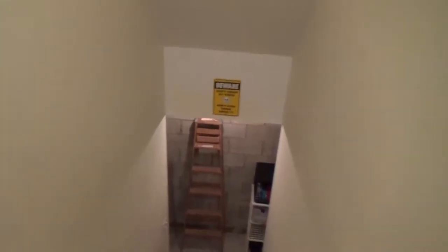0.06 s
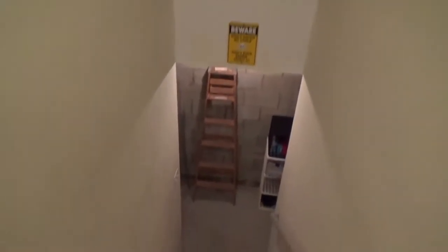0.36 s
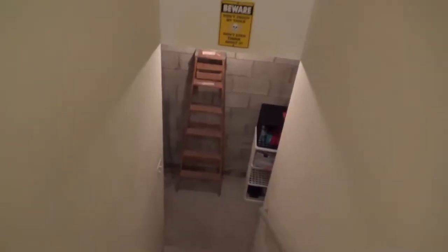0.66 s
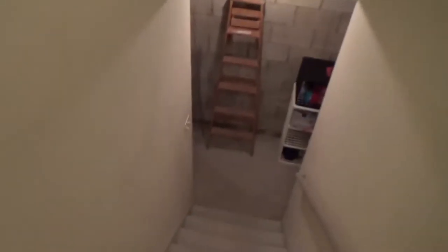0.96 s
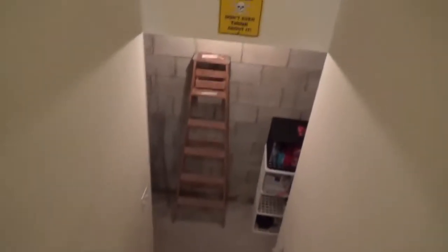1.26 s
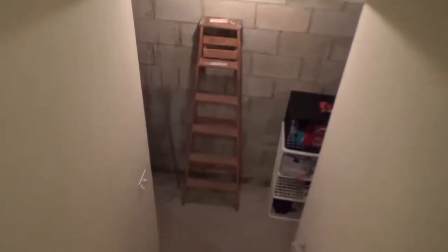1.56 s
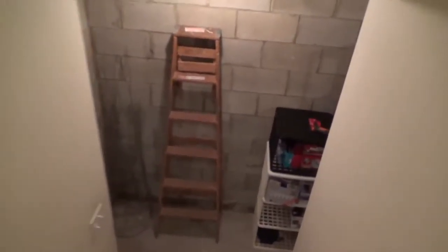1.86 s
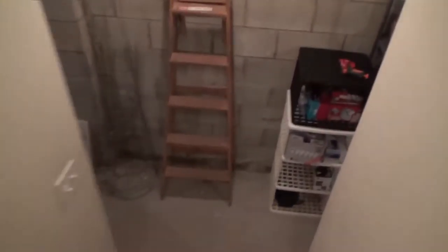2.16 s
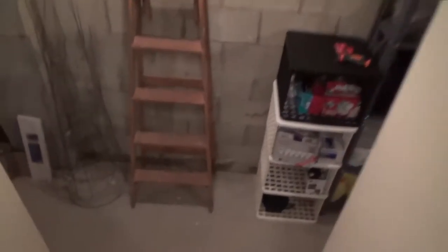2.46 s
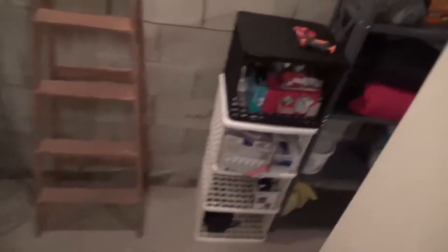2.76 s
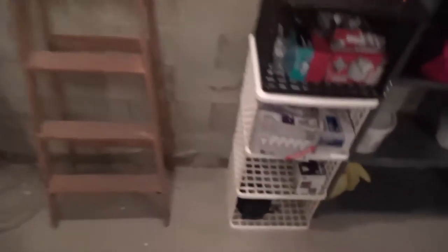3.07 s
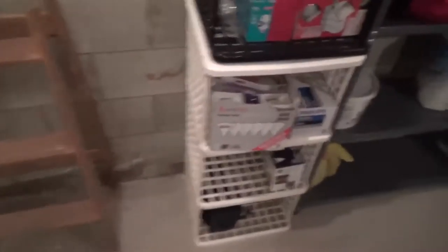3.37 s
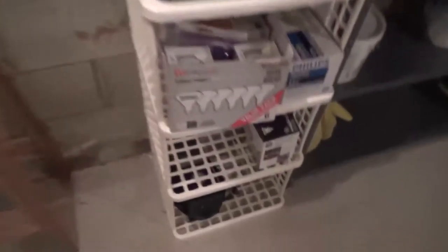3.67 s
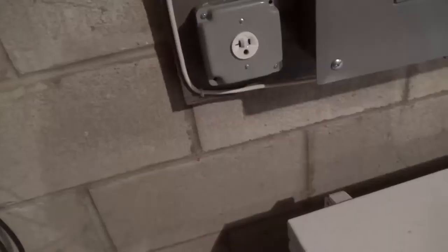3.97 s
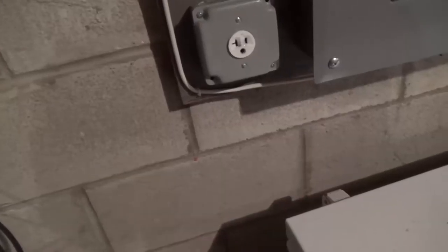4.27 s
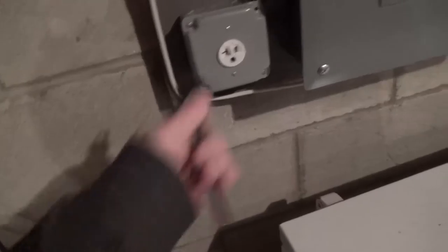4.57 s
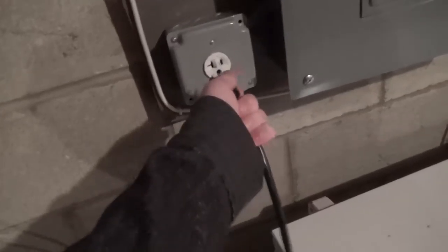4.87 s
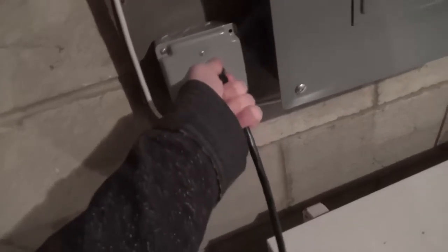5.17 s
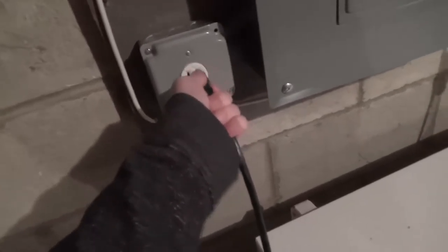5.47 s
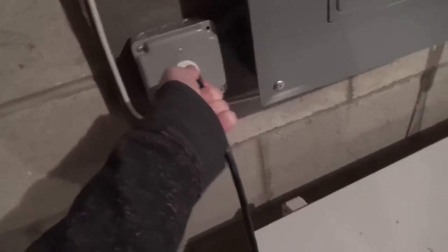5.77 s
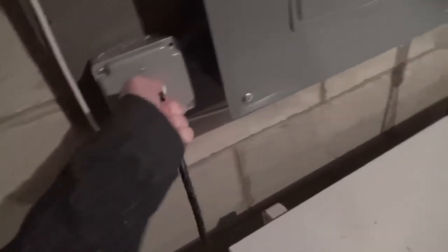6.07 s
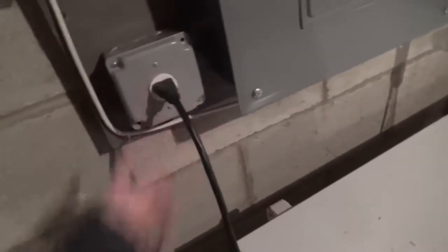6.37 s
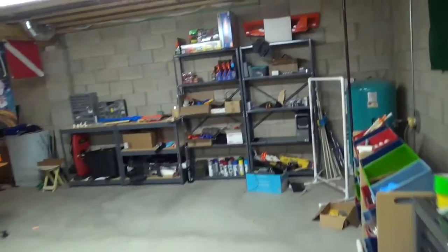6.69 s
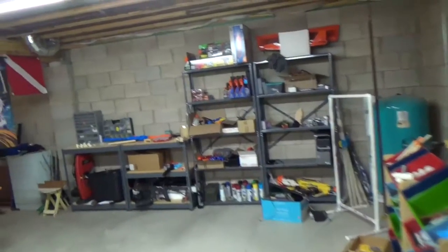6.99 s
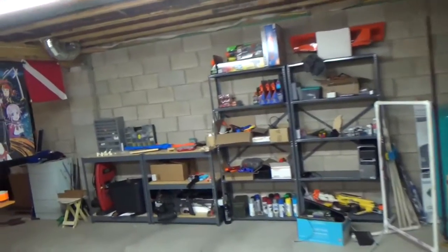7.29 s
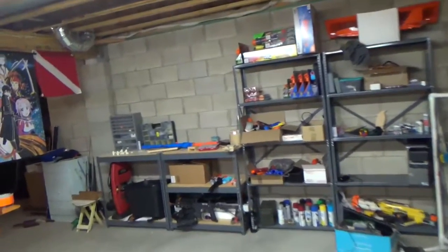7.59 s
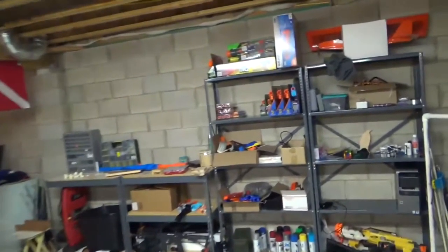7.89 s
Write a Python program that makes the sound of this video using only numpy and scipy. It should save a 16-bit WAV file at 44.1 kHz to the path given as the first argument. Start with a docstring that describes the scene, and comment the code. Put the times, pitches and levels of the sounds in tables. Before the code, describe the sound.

From the start, heavy shoes go down wooden stairs in a narrow stairwell, close by, about two steps a second. Each lands toe then heel with a hollow boom and a clack, among small sharp clicks and faint clothing rustle. A sole scrapes at about 1.8 seconds. The steps lighten and end with a gritty scuff on concrete near 3.8 seconds. A faint machine hum, present throughout, becomes slightly louder at 4 seconds and is heard alone for a moment. From 5.2 to 5.9 seconds a plug is worked into a metal outlet box with several short, ringing knocks and grating prongs, the last push loudest. A sleeve swishes and small clicks follow, then a brief, close plastic rattle at 6.5 seconds. The hum drops back, and from about 7 to 8 seconds a jacket swishes softly between a few light, dull taps echoing in the basement.

```python
"""A narrow stairwell: heavy shoes go down wooden stairs, exciting the modes of each tread and the hollow
beneath, and scuff onto basement concrete amid small clicks. The scene jumps to a metal outlet box, which
rings as a plug is worked in, then, after a close plastic rattle, to the open basement, where a jacket
swishes between a few light taps. Impacts are cracks with decaying echoes, friction is modulated noise,
and a machine hums faintly throughout."""
import sys
import numpy as np
from scipy.fft import rfft, irfft, next_fast_len
from scipy.io import wavfile
from scipy.ndimage import map_coordinates

SR = 44100
rng = np.random.default_rng(int(sys.argv[2]) if len(sys.argv) > 2 else 0)


def wav_out(sig):
    """Save sig, one row per channel (or a flat mono array), as 16-bit PCM at SR to the path in sys.argv[1]."""
    wavfile.write(sys.argv[1], SR, np.round(np.clip(np.atleast_2d(sig).T, -1, 1) * 32767).astype(np.int16))


N = 350154
TIME = np.arange(N) / SR
AGE = np.arange(24576) / SR  # seconds since an impact

# jumps of the scene, where all ringing stops: time_s
JUMPS = [3.931, 6.54]
# the ball of the foot landing: start_s, thump_db, clack_db, tread_hz, sole_hz, settle_after_s,
# settle_thump_db, settle_clack_db, settle_grit_db, swish_lead_s, swish_db
TOES = [(0.427, -18.5, -16.5, 403, 1380, .071, -31.5, -36, -31.5, 0.057, -57),
        (0.902, -13, -22.5, 395.7, 1220, 0.069, -19, -19.5, -31, 0.037, -37),
        (1.501, -15.5, -17, 370.8, 1180, 0.077, -19.5, -14.5, -37, 0.049, -38),
        (2.023, -16, -14, 429, 1400, 0.075, -24.5, -22.5, -40, 0.072, -35),
        (2.475, -14, -14, 405.5, 1260, .048, -14.5, -23, -32.5, .079, -38.5),
        (3.05, -16.5, -20, 351, 1180, 0.067, -22.5, -25, -36, 0.092, -41),
        (3.595, -25.5, -23, 450, 1600, .047, -39, -42, -34.5, 0.056, -52.5)]
# the heel landing: the same columns without the last two
HEELS = [(0.002, -27, -30, 175.5, 1420, 0.044, -45, -44, -60),
         (1.126, -20, -18, 372.5, 1260, 0.065, -19, -18.5, -27),
         (1.701, -18.5, -19, 385.3, 1300, 0.062, -19.5, -16.5, -17),
         (2.177, -12.5, -18, 391.7, 1230, 0.07, -20, -22, -33),
         (2.652, -14, -21, 381.9, 1250, .054, -23, -32, -56),
         (3.207, -18.5, -17.5, 428.4, 1570, .069, -23.5, -29, -45),
         (3.751, -34, -28.5, 437, 1400, 0.05, -34.5, -24, -45)]


def amp(db):
    """Decibels to amplitude ratio."""
    return 10 ** (np.asarray(db) / 20)


def along(points, hz):
    """Interpolation of (frequency_hz, value) points on a logarithmic frequency axis."""
    f, v = np.transpose(points)
    return np.interp(np.log(hz + 1), np.log(f + 1), v)


def wobble(rate):
    """Slow random modulation: a spline through rate knots a second."""
    return map_coordinates(rng.standard_normal(int(N * rate / SR) + 4), [TIME * rate], order=2)


def filtered(x, gain):
    """Linear filtering: the spectrum of x times gain(hz)."""
    m = next_fast_len(N + 8192)
    return irfft(rfft(x, m) * gain(np.fft.rfftfreq(m, 1 / SR)), m)[..., :N]


def noise(spectrum):
    """Stationary coloured noise, mid and side, with a mid rms of 1."""
    x = filtered(rng.standard_normal((2, N)), lambda hz: amp(along(spectrum, hz)))
    return x / x[0].std()


def causal(spectrum):
    """The minimum-phase response with this spectrum: nothing sounds before the impact."""
    n = len(AGE)
    cepstrum = irfft(np.log(amp(along(spectrum, np.fft.rfftfreq(n, 1 / SR))) + 1e-6))
    cepstrum[1:n // 2] *= 2
    cepstrum[n // 2 + 1:] = 0
    return np.exp(rfft(cepstrum))


def resonant(hz, boost_db, q):
    """A second-order resonance added to a flat response."""
    ratio = np.fft.rfftfreq(len(AGE), 1 / SR) / hz
    return 1 + amp(boost_db) * 1j * ratio / (1j * ratio + q * (1 - ratio * ratio))


def ripple(depth, life_s):
    """Interference with a small body's brief ringing puts chance peaks and dips in a response."""
    ringing = rng.standard_normal(len(AGE)) * np.exp(-AGE / life_s)
    return 1 + depth * rfft(ringing / np.linalg.norm(ringing))


def levelled(pair):
    """Normalisation to a mid rms of 1 over the first 40 ms, so spectra and modes set only the colour."""
    return pair / np.sqrt(np.mean(pair[0, :int(.04 * SR)] ** 2))


def blow(colour, t60, hold, crack_db, crack_t60):
    """Direct sound and diffuse field: a crack, and echoes that hold, then decay (times in seconds)."""
    field = rng.standard_normal((2, len(AGE))) * amp(-60 * (np.hypot(AGE, hold) - hold) / t60)
    field[0] += rng.standard_normal(len(AGE)) * amp(crack_db - 60 * AGE / crack_t60)
    return levelled(irfft(rfft(field) * colour))


def ring(modes, tuning, attack_s, detune, scatter_db):
    """Free vibration: damped modes, scattered in pitch and strength, reach the side in another phase."""
    hz, db, t60 = np.transpose(modes)[:, :, None]
    drift, strength, offset = rng.standard_normal((3, len(modes), 1))
    phase = (2 * np.pi * hz * tuning * (1 + detune * drift) * AGE).astype(np.float32)
    side_shift = (np.pi * offset).astype(np.float32)
    decay = amp(db + scatter_db * strength) * np.exp(-np.log(1000) * AGE / t60)
    pair = np.array([(decay * np.sin(phase + shift)).sum(0) for shift in (0, side_shift)])
    return levelled(pair * (1 - np.exp(-AGE / attack_s)))


def swish(s, half_s, db):
    """A Gaussian envelope of rubbing centred on s seconds."""
    return amp(db) * np.exp(-.5 * ((TIME - s) / half_s) ** 2)


def add(track, s, sound):
    """Superposition of a sound from s seconds on, cut off at the scene's next jump."""
    start = max(0, round(s * SR))
    end = min([round(j * SR) for j in JUMPS if j > s] + [N, start + sound.shape[1]])
    track[:, start:end] += sound[:, :end - start]


def contacts():
    """A footfall is a series of impacts: toe and heel land, then settle; the toe also rolls flat."""
    roll_fade = [(2.1, 0), (3.6, -15)]  # the feet land flatter near the bottom: time_s, gain_db
    grit_re_clack_db, grit_db_per_octave = -16, 14
    # the body's weight arrives as the toe settles and shakes the stairs most
    for rows, settle_bass_db in ((TOES, 6), (HEELS, -1.5)):
        for s, thump, clack, tread_hz, sole_hz, wait_s, late_thump, late_clack, late_grit, *_ in rows:
            grit = clack + grit_re_clack_db + grit_db_per_octave * np.log2(sole_hz / 1350)
            yield s, thump, clack, grit, 0, tread_hz, sole_hz
            loaded_sole_hz = 1350 * 1.136  # a loaded sole clacks higher
            yield s + wait_s, late_thump, late_clack, late_grit, settle_bass_db, tread_hz, loaded_sole_hz
    for s, thump, clack, tread_hz, sole_hz, *_ in TOES:
        fade_db = np.interp(s, *np.transpose(roll_fade))
        roll_thump, roll_clack = thump - 3.5 + fade_db, clack - 8 + fade_db
        yield s + .025, roll_thump, roll_clack, roll_clack + grit_re_clack_db, -4, tread_hz, sole_hz


def footsteps():
    """Impact excitation: each contact booms in the hollow stairs, rings a tread and clacks on grit."""
    tread_modes = [(384.7, 1.5, 0.45), (161.4, -12, 0.17), (214.5, -16, 0.69), (394.4, -2, 0.16),
                   (444, -3, 0.33), (492, -12.5, 0.48), (531.4, -8, 0.26), (688, -7.5, 0.45),
                   (802, -18, 0.29), (920, -19, 0.22)]  # a wooden tread, main mode first: pitch_hz, level_db, t60_s
    hollowness = [(0, 5), (.42, 0), (.9, 2), (1.7, 1.5), (2.2, -0.5), (2.7, -1.5), (3.12, 5.5), (3.21, -4),
                  (3.6, -18)]  # depth of the boom, fading towards the concrete: time_s, gain_db
    # spectra of a footfall's parts, low to high: frequency_hz, density_db
    boom_spectrum = [(20, -32), (40, -7), (53, -1.5), (68, -6), (85, -3.5), (110, 3), (140, -26),
                     (300, -57)]
    thud_spectrum = [(70, -28.5), (125, -8), (160, 2.5), (230, 2.5), (290, -10.5), (400, -9), (900, -66)]
    knock_spectrum = [(100, -37), (220, -6), (340, -2.5), (480, -0.5), (580, -5), (720, -5.5), (950, -10),
                      (2000, -70)]
    sole_spectrum = [(300, -30), (750, -1), (1000, 2.5), (1350, 2.5), (1800, -1), (2600, -9.5), (4000, -22),
                     (8000, -42.5)]  # for a sole pitched at 1350 Hz
    grit_spectrum = [(1000, -29), (2800, 9.5), (4000, 8), (5500, 2), (7000, -2.5), (10000, 0),
                     (12500, -8.5), (15500, -33)]
    out = np.zeros((2, N))
    boom, thud, knock, grit = map(causal, (boom_spectrum, thud_spectrum, knock_spectrum, grit_spectrum))
    landing = 1 - np.exp(-AGE / .0013)  # the rubber sole gives a little
    for s, thump_db, clack_db, grit_db, bass_db, tread_hz, sole_hz in contacts():
        hollow_db = np.interp(s, *np.transpose(hollowness))
        deep_db = thump_db + hollow_db + bass_db
        sole = causal(np.array(sole_spectrum) * [sole_hz / 1350, 1])
        clack = sole * ripple(depth=.75, life_s=.0053) * resonant(sole_hz, boost_db=-9.5, q=9)
        step = amp(deep_db - 25) * blow(boom, t60=.38, hold=.023, crack_db=7.5, crack_t60=.014)
        step += amp(deep_db - 16.5) * blow(thud, t60=.24, hold=.075, crack_db=3, crack_t60=.17)
        step += amp(thump_db - 4.5) * blow(knock, t60=.51, hold=.014, crack_db=7, crack_t60=.045)
        tuning = tread_hz / tread_modes[0][0]
        tread = ring(tread_modes, tuning, attack_s=.0062, detune=.01206, scatter_db=6.5)
        step += amp(thump_db + .36 * hollow_db - 6) * tread
        step += amp(clack_db - 5.5) * blow(clack, t60=.48, hold=.0023, crack_db=14.5, crack_t60=.024)
        crunch = grit * ripple(depth=.44, life_s=.0014)
        step += amp(grit_db - 6) * blow(crunch, t60=.34, hold=.0018, crack_db=9.5, crack_t60=.012)
        add(out, s, step * landing)
    return out


def clothes():
    """Stick-slip friction: the weave catches and slips as legs stride, an arm reaches, the body turns."""
    stride = [(0, -48), (0.4, -66), (0.6, -53), (1.2, -48.5), (2.5, -47.5), (3.6, -51), (3.93, -51)]  # faint rubbing while walking: time_s, level_db
    reaches = [(5.3, 0.12, -57.5), (5.76, 0.067, -52.5), (6.035, 0.02, -41), (6.203, 0.063, -56),
               (6.65, 0.22, -58.5)]  # the sleeve as the arm works: centre_s, half_length_s, level_db
    turns = [(7.035, -46.5), (7.4, -45), (7.681, -45.5), (7.96, -48.5)]  # the jacket as the body turns: centre_s, level_db
    # friction spectra of trousers and sleeve, and of the jacket: frequency_hz, density_db
    limb_spectrum = [(400, -2), (800, 4), (1500, 1), (3000, -3), (5000, -7.5), (7000, -9.5), (10000, -5),
                     (12000, -9), (15500, -28.5)]
    jacket_spectrum = [(350, -31), (600, -2.5), (706, -3.5), (855, -6), (1030, -1), (1230, -1),
                       (1510, -0.5), (3240, 0), (7140, -5.5), (10200, -3), (12100, -7), (15500, -21)]
    rubbing = amp(np.interp(TIME, *np.transpose(stride), right=-120))
    knee_bends = sum(swish(s + .088, half_s=.021, db=.5) for s, *_ in HEELS[1:])
    leg_swings = sum(swish(s - lead_s, half_s=.015, db=db) for s, *_, lead_s, db in TOES)
    limbs = rubbing * (1 + knee_bends) + leg_swings + sum(swish(*reach) for reach in reaches)
    turning = (TIME > 6.99) * (amp(-50) + sum(swish(s, half_s=.044, db=db) for s, db in turns))
    catching = amp(.52 * wobble(60) + 1.86 * wobble(800))
    return catching * (limbs * noise(limb_spectrum) + turning * noise(jacket_spectrum))


def machine():
    """A line spectrum over broadband noise: a distant machine's wavering tones and a soft rush of air."""
    partials = [(86.1, -68.5), (188.4, -64), (382.2, -61), (2885, -87)]  # the hum: pitch_hz, relative_db
    air_spectrum = [(15, -52.5), (25, -17), (49, -46.5), (71, -15.5), (178, -10), (260, -8.5), (289, -16),
                    (378, -3), (421, -11), (871, -15.5), (1660, -25), (1800, -24), (1950, -25.5),
                    (2490, -26.5), (15500, -37.5)]  # the rush: frequency_hz, density_db
    # gains of hum and air in each place: stairwell_db, outlet_db, basement_db
    hum_db = [-55.5, -45, -68]
    air_db = [-52, -49.5, -54]
    place = np.searchsorted(JUMPS, TIME)
    swell, waver = amp(3.3 * wobble(4.8)), wobble(4.7)
    tones = sum(amp(db + 49) * np.sin(2 * np.pi * hz * TIME + .5 * waver) for hz, db in partials)
    mid_side = np.array([[1], [.5]])
    return amp(air_db)[place] * noise(air_spectrum) + amp(hum_db)[place] * swell * tones * mid_side


def clicks():
    """Brief impulses have broad spectra: small sharp ticks near by, with a sparkle in the high treble."""
    events = [(0.325, -37, -60), (0.9537, -21, -39), (1.345, -23.5, -54), (2.2906, -24, -40.5),
              (3.0925, -18.5, -38), (3.1377, -25, -37), (3.179, -32, -38.5), (3.6416, -21, -37),
              (3.7179, -37, -36.5), (3.8588, -18, -55), (5.472, -30.5, -62), (5.9569, -29, -31.5),
              (6.1835, -35, -45.5)]  # the clicks: start_s, tick_db, sparkle_db
    # spectra of their two parts: frequency_hz, density_db
    tick_spectrum = [(700, -21), (1800, 9), (3300, 5.5), (5000, 8), (7000, -11), (12000, -36)]
    sparkle_spectrum = [(3000, -30.5), (7000, 1), (10000, 2), (13000, -3.5), (15500, -17)]
    out, tick, sparkle = np.zeros((2, N)), causal(tick_spectrum), causal(sparkle_spectrum)
    for s, tick_db, sparkle_db in events:
        colour = tick * ripple(depth=.87, life_s=.0015)
        add(out, s, amp(tick_db - 19) * blow(colour, t60=.28, hold=.002, crack_db=16, crack_t60=.022))
        add(out, s, amp(sparkle_db - 9) * blow(sparkle, t60=.17, hold=.002, crack_db=11, crack_t60=.016))
    return out


def scrapes():
    """Sliding friction: a sole crushes grains of grit, and reverberation carries the hiss on."""
    slides = [(1.768, 0.062, -26), (3.754, 0.044, -24.5)]  # soles sliding: start_s, length_s, level_db
    grit_spectrum = [(180, -40), (300, -12), (453, 2), (620, -4), (1030, -0.5), (1620, -5.5), (2250, -3),
                     (2880, -1), (6050, -13), (10600, -16.5), (13600, -32), (15500, -58.5)]  # crushed grit: frequency_hz, density_db
    out, colour = np.zeros((2, N)), causal(grit_spectrum)
    slide_t60, echo_t60 = .2, .32
    for s, length_s, db in slides:
        since_stop = np.maximum(AGE - length_s, 0)
        sliding = np.clip(AGE / .0093, 0, 1) * amp(-60 * since_stop / slide_t60)
        echoing = np.clip(AGE / length_s, 0, 1) * amp(-60 * since_stop / echo_t60)
        grains = rng.standard_normal((2, len(AGE))) * rng.exponential(size=len(AGE)) ** 1.4
        echoes = rng.standard_normal((2, len(AGE))) * echoing
        add(out, s, amp(db) * levelled(irfft(rfft(grains * sliding + 1.14 * echoes) * colour)))
    return out


def plug():
    """Impact and friction: each push rings the box on its board as prongs grate into their contacts."""
    pushes = [(5.186, -17, -8, -37), (5.212, -19.5, -24, -23), (5.474, -23.5, -5, -28),
              (5.602, -38.5, -3, -26), (5.858, -12.5, -1, -17), (5.88, -9, -5.5, -13)]  # pushes on the plug: start_s, level_db, box_relative_db, prong_relative_db
    box_modes = [(300, -9, 0.3), (373, -15.5, 0.39), (685, -10.5, 0.26), (750.6, 3, 0.12),
                 (871, -3.5, 0.19), (957, -2, 0.11), (1295, -11, 0.14), (1900, -15, 0.14),
                 (2082, -16, 0.11), (3930, -29, .12), (4210, -17, 0.09), (5430, -33, .1)]  # the metal outlet box: pitch_hz, level_db, t60_s
    # spectra of the board, the grating prongs and their slide in the slots: frequency_hz, density_db
    board_spectrum = [(20, -62), (60, -48), (120, -9.5), (300, -3.5), (520, -1.5), (700, 3), (920, 3.5),
                      (1200, -8), (2000, -13.5), (3200, -22), (5700, -31), (9000, -47)]
    prong_spectrum = [(880, -16), (1500, -0.5), (2370, -0.5), (3250, -8.5), (3760, -4.5), (5340, -5.5),
                      (6190, -9.5), (6620, -11.5), (10300, -7), (12900, -18), (15500, -54)]
    slide_spectrum = [(2200, -40), (3000, 0), (3700, -25), (6000, -40)]
    out, board, prongs = np.zeros((2, N)), causal(board_spectrum), causal(prong_spectrum)
    for s, db, box_db, prong_db in pushes:
        push = amp(box_db - 6.5) * ring(box_modes, tuning=1, attack_s=.001, detune=.006, scatter_db=1.5)
        push += amp(box_db - 10) * blow(board, t60=.46, hold=.002, crack_db=11, crack_t60=.042)
        grating = prongs * ripple(depth=1, life_s=.0018)
        push += amp(prong_db - .5) * blow(grating, t60=.54, hold=.002, crack_db=18.5, crack_t60=.074)
        add(out, s, amp(db) * push)
    return out + swish(5.37, half_s=.05, db=-60) * noise(slide_spectrum)


def rattle():
    """Direct sound dominates at short range: plastic bumps and snaps too close for the room to answer."""
    bumps = [(6.503, -28.5, -52), (6.5114, -30, -27.5), (6.528, -57, -29), (6.535, -55, -56)]  # plastic contacts: start_s, shell_db, snap_db
    # spectra of the shell's bump and its snap: frequency_hz, density_db
    shell_spectrum = [(30, -50), (110, -13), (230, 1), (430, 0.5), (850, -17), (1400, -7), (2000, 0.5),
                      (3100, -16), (6000, -10.5), (9000, -18), (13000, -35)]
    snap_spectrum = [(240, -25), (400, -9), (673, -23), (847, 1.5), (987, -5), (1610, -4.5), (5070, -6.5),
                     (7100, -11), (10700, -8), (15500, -27)]
    out, shell, snap = np.zeros((2, N)), causal(shell_spectrum), causal(snap_spectrum)
    pressing = 1 - np.exp(-AGE / .0012)
    for s, shell_db, snap_db in bumps:
        bump = pressing * blow(shell, t60=.043, hold=.004, crack_db=3, crack_t60=.032)
        add(out, s, amp(shell_db) * bump)
        add(out, s, amp(snap_db) * blow(snap, t60=.067, hold=.001, crack_db=-2, crack_t60=.012))
    return out


def taps():
    """Reverberation prolongs light, dull impacts further off in the room."""
    events = [(6.935, -49), (7.242, -48.5), (7.5293, -41.5), (7.64, -49.5)]  # the taps: start_s, level_db
    tap_spectrum = [(120, -20), (300, 0.5), (540, -1), (800, 0), (1600, -5), (3000, -12), (8000, -46)]  # their colour: frequency_hz, density_db
    out = np.zeros((2, N))
    colour = causal(tap_spectrum) * resonant(hz=523, boost_db=-1.5, q=4)
    for s, db in events:
        add(out, s, amp(db) * blow(colour, t60=.85, hold=.005, crack_db=12, crack_t60=.04))
    return out


def placed(pair, width, lean):
    """Mid and side to left and right; lean scales the level and phase cues that give a direction."""
    level_cue = [(40, 4), (130, 2), (300, .7), (600, 0), (8000, -.3)]  # the bass is louder on the right: frequency_hz, right_over_left_db
    phase_cue = [(40, .1), (110, 0.43), (260, 0.54), (600, 0.66), (2330, 0.15), (7000, 0)]  # the left hears it first: frequency_hz, lead_rad
    mid, side = pair[0], filtered(pair[1], lambda hz: amp(along(width, hz)))
    share = lean * np.array([[-.5], [.5]])
    return filtered(np.array([mid + side, mid - side]),
                    lambda hz: amp(share * along(level_cue, hz)) * np.exp(-1j * share * along(phase_cue, hz)))


def scene():
    """Reflections from close walls spread the footfalls wide; in the other sounds bass is nearly mono."""
    # stereo width of the stairwell and the open basement: frequency_hz, side_over_mid_db
    stair_width = [(40, -15), (100, -14), (200, -9.5), (450, -7.5), (1200, -4.5), (4000, -7.5),
                   (10000, -17)]
    room_width = [(60, -24), (110, -22), (200, -20), (380, -16.5), (700, -8.5), (1290, -6), (2380, -7),
                  (4400, -7), (8120, -10), (15000, -27)]
    stairwell = placed(footsteps(), stair_width, lean=1)
    room = clothes() + machine() + clicks() + scrapes() + plug() + rattle() + taps()
    return stairwell + placed(room, room_width, lean=0)


def record(dry):
    """Soft saturation rounds the highest peaks, and a low-pass filter limits the band."""
    ceiling, top_hz = .7, 15700
    rounded = dry / (1 + np.abs(dry / ceiling) ** 4) ** (1 / 4)
    return filtered(rounded, lambda hz: hz < top_hz)


dry = scene()
out = record(dry)
wav_out(out)
```